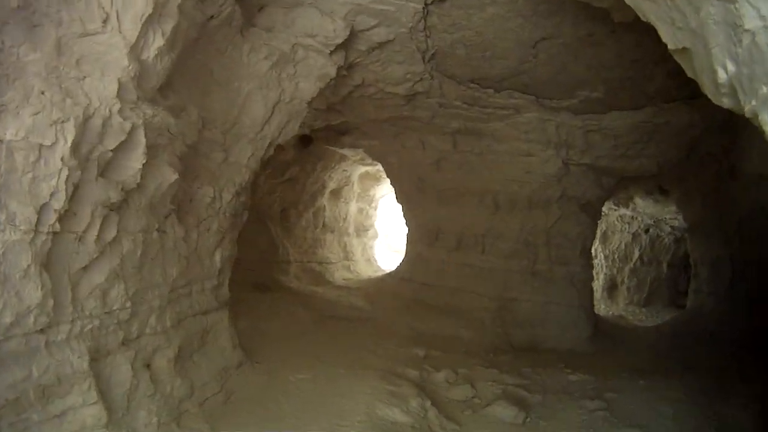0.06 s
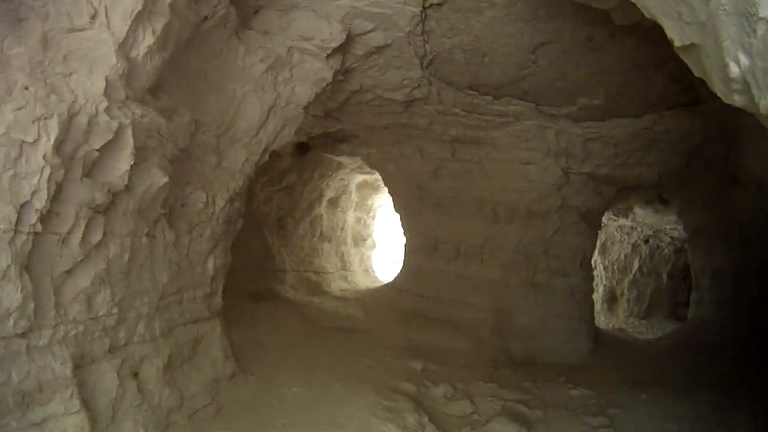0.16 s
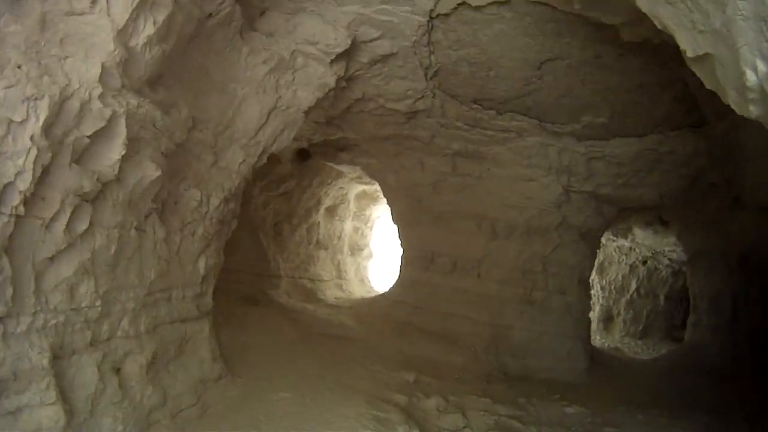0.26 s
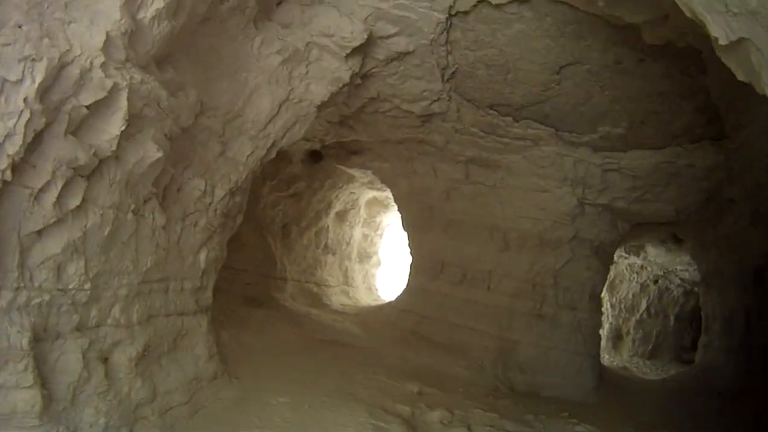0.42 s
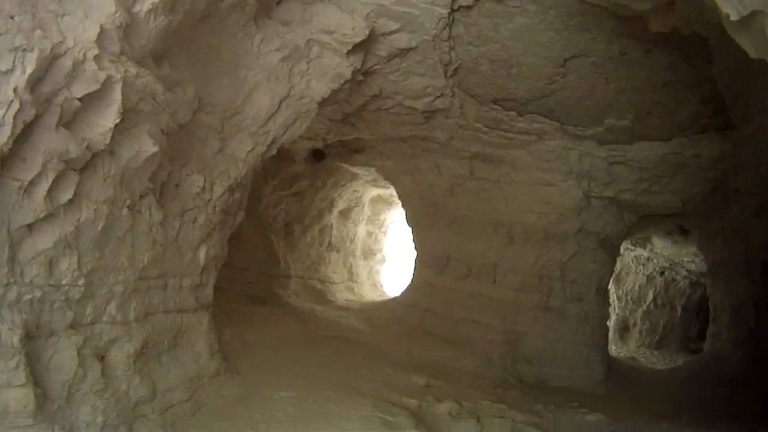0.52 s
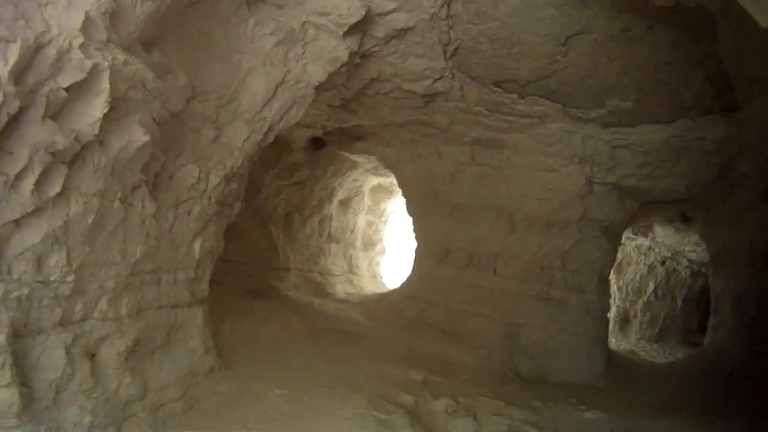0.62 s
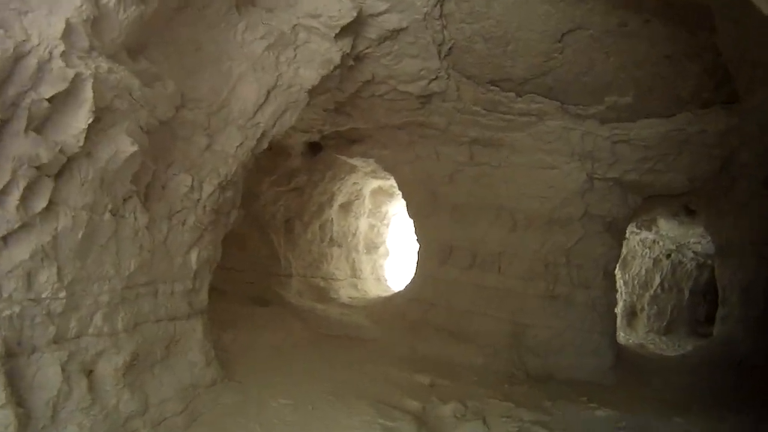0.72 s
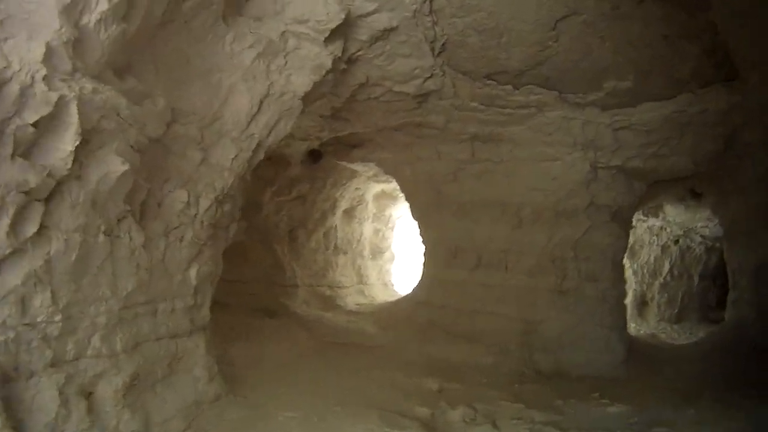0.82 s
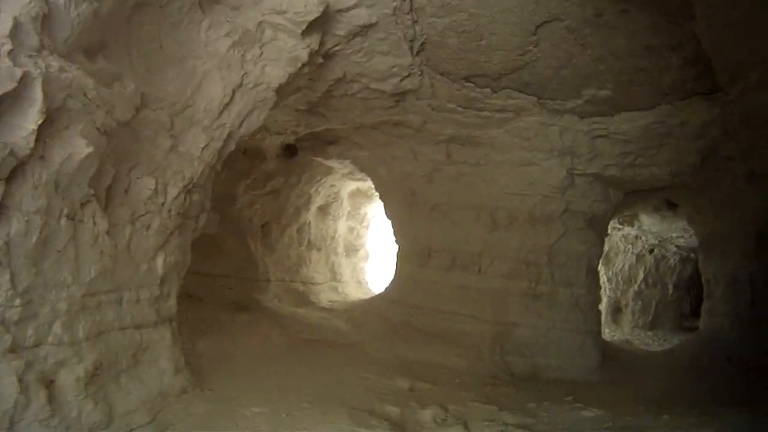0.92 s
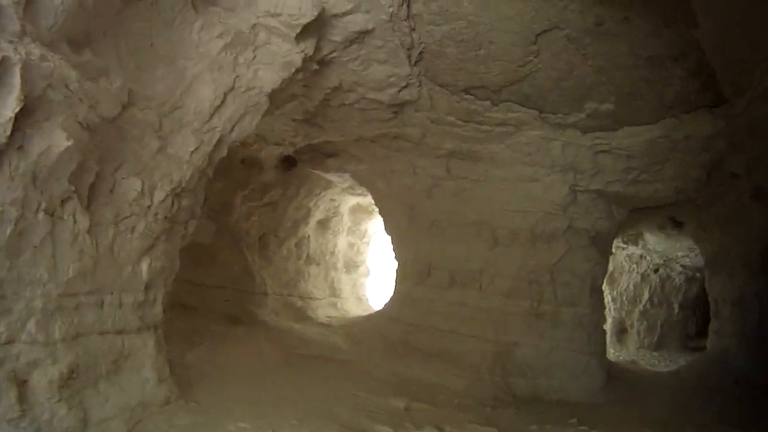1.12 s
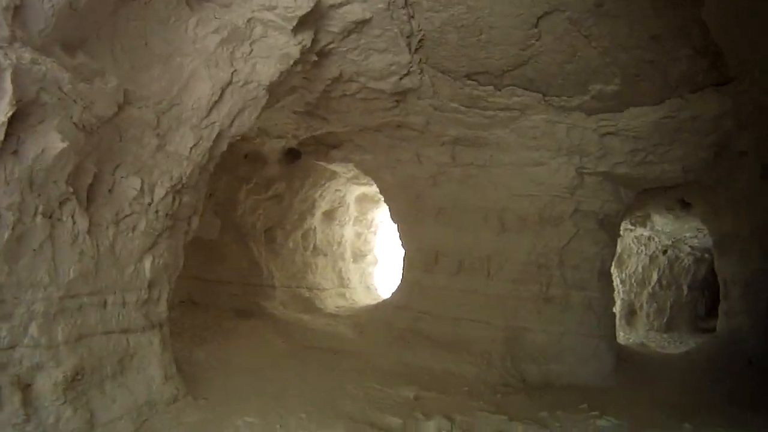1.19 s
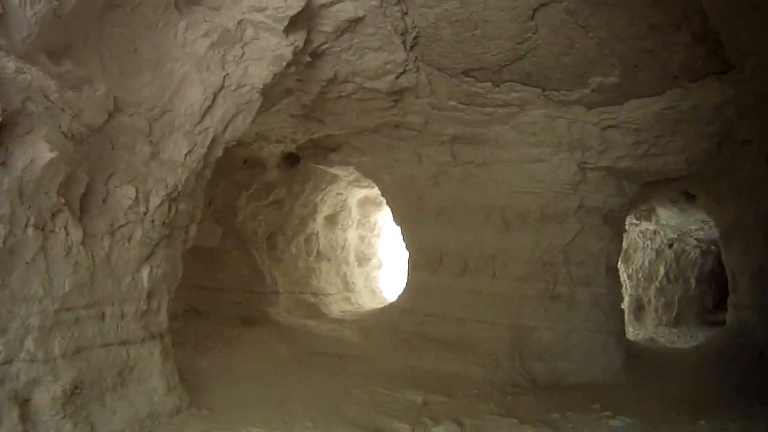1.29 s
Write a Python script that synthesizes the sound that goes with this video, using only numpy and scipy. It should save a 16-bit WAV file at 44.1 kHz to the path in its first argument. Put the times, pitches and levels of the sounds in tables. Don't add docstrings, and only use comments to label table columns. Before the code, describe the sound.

Someone walks over rubble in a rock passage; a sharp click comes first, then dense crunching, scuffing and squeaky chatter, thinning at the end, with handling rumble and a thin, grainy small-camera sound.

```python
import sys
import numpy as np
from scipy import signal
from scipy.fft import rfft, irfft
from scipy.io import wavfile
from scipy.ndimage import uniform_filter1d

SR = 44100
rng = np.random.default_rng(int(sys.argv[2]) if len(sys.argv) > 2 else 0)


def pcm_store(signal):
    levels = np.round(np.clip(np.atleast_2d(signal), -1, 1) * 32767)
    wavfile.write(sys.argv[1], SR, levels.astype(np.int16).T)


def amplitude_ratio(level_db):
    exponent = np.asarray(level_db, float) / 20
    return 10 ** exponent


N = 59535
TIME = np.arange(N) / SR
EDGE_HZ = 5500


def rms_one(x):
    return x / np.sqrt(np.mean(x ** 2) + 1e-20)


def evened(x, share, seconds):
    x = rms_one(x)
    power = uniform_filter1d(x ** 2, int(seconds * SR))
    return rms_one(x / (power + 0.00086) ** (share / 2))


def coloured(spectrum):
    hz, db = np.transpose(spectrum)
    f = np.arange(N // 2 + 1) * SR / N + 1e-3
    curve_db = np.interp(np.log(f), np.log(hz), db, left=-60, right=-80)
    return rms_one(irfft(rfft(rng.standard_normal(N)) * amplitude_ratio(curve_db), N))


def band(x, low_hz, high_hz, order=4):
    return signal.sosfilt(signal.butter(order, [low_hz, high_hz], "band", fs=SR, output="sos"), x)


def impulses(s, db):
    out = np.zeros(N)
    np.add.at(out, (np.array(s) * SR).astype(int), amplitude_ratio(db))
    return out


def strike(force, modes):
    rings = []
    for hz, db, t60 in modes:
        r = amplitude_ratio(-60 / (t60 * SR))
        w = 2 * np.pi * hz / SR
        ring = signal.lfilter([0, np.sin(w)], [1, -2 * r * np.cos(w), r * r], force + 1e-18)
        rings.append(amplitude_ratio(db) * ring)
    return np.array(rings)


# (frequency [Hz], density [dB per Hz])
AIR = [(88, -19), (150, -2.5), (396, -3), (591, -6.5), (711, -5.5), (1010, -8), (2260, -9), (4950, -17.5),
       (5950, -17.5), (7740, -60), (13100, -120)]


def air():
    return amplitude_ratio(-62.5) * coloured(AIR)


# (time [s], level [dB])
SHAKE = [(0.0, -51), (0.074, -59), (0.168, -45.5), (0.24, -55), (0.344, -50.5), (0.372, -56), (0.406, -48),
         (0.446, -51), (0.548, -56), (0.62, -51.5), (0.71, -55), (0.97, -52.5), (0.992, -59),
         (1.138, -49.5), (1.15, -57.5), (1.258, -52), (1.318, -63.5), (1.35, -48)]
# (frequency [Hz], density [dB per Hz])
RUMBLE = [(8.8, -17), (15, 0), (54, 1), (77, -3.5), (125, -14), (211, -21), (300, -29.5), (390, -54),
          (660, -120)]


def rumble():
    level_db = np.interp(TIME, *np.transpose(SHAKE)) - 1.5
    return amplitude_ratio(level_db) * evened(coloured(RUMBLE), 0.75, 0.047)


def scrapes(strokes, modes):
    grains_per_s, spread_db = 1000, 3
    favour_db_per_oct2, favour_floor_db = 128, 5.5
    shape = (len(modes), N)
    hits = rng.random(shape) < grains_per_s / SR
    signs = rng.choice([-1, 1], N)
    grit = hits * signs * amplitude_ratio(spread_db * np.minimum(rng.exponential(1, N), 5))
    power = np.zeros(shape)
    hz, mode_db, _ = np.transpose(modes)
    for s, length, db, favoured_hz in strokes:
        loss_db = np.minimum(favour_db_per_oct2 * np.log2(hz / favoured_hz) ** 2, favour_floor_db)
        share = amplitude_ratio(mode_db - loss_db)
        share = share / np.sqrt(np.sum(share ** 2))
        swell = np.cos(np.pi / 2 * np.clip((TIME - s) / (0.65 * length), -1, 1))
        power += (amplitude_ratio(db) * share[:, None] * swell) ** 2
    out = np.zeros(N)
    for p, grains, mode in zip(power, grit, modes):
        out += np.sqrt(p) * evened(strike(grains, [mode])[0], 0.64, 0.013)
    return out


# (middle time [s], length [s], level [dB], favoured pitch [Hz])
GRAZES = [(.015, 0.046, -60.5, 1900), (.03, 0.052, -62.5, 2700), (.165, 0.03, -64, 2180),
          (.34, 0.021, -58.5, 2380), (.425, 0.023, -55.5, 1810), (.535, 0.049, -59.5, 2500),
          (.585, 0.054, -66, 2430), (.612, 0.026, -53.5, 1460), (.647, 0.016, -60, 2430),
          (.652, 0.0083, -54, 1373), (.258, 0.066, -59.5, 2620), (.59, 0.017, -61, 2270),
          (.889, 0.0079, -61, 2100), (.70, 0.09, -62, 2250), (.752, 0.031, -50.5, 2260),
          (.785, 0.039, -51.5, 2350), (.81, 0.038, -56, 2400), (.838, 0.032, -52, 2320),
          (.858, 0.023, -63, 1900), (.895, 0.024, -60, 2080), (.925, 0.072, -54.5, 2240),
          (.956, 0.027, -58.5, 2190), (.995, 0.032, -58.5, 1970), (1.056, 0.0094, -62.5, 1960),
          (1.097, 0.023, -58, 2140), (1.13, 0.02, -64, 2600), (1.153, 0.01, -55, 2100),
          (1.174, 0.017, -52, 1690), (1.21, 0.043, -65, 2400), (1.245, 0.024, -56, 2280)]
# (frequency [Hz], level [dB], t60 [s])
RUB_BRIGHT = [(1373, -2, 0.042), (1655, -2, 0.095), (1900, -6, 0.035), (2038, -1.5, 0.024),
              (2273, 2, 0.026), (2570, -3.5, 0.016), (2840, -16, 0.031), (3275, -11.5, .03),
              (4430, -12.5, 0.0054)]


def grazes():
    return band(scrapes(GRAZES, RUB_BRIGHT), 960, EDGE_HZ, order=2)


# (middle time [s], length [s], level [dB], favoured pitch [Hz])
GRINDS = [(.012, 0.041, -61, 830), (.425, 0.046, -66.5, 875), (.607, 0.012, -54.5, 584),
          (.617, 0.011, -56.5, 830), (.669, 0.037, -62.5, 830), (.705, 0.072, -61.5, 620),
          (.75, 0.031, -62, 810), (.795, 0.032, -56, 800), (.812, 0.04, -57.5, 830),
          (.84, 0.072, -63.5, 795), (.903, 0.027, -55, 830), (.924, 0.028, -52.5, 830),
          (.934, 0.012, -47, 860), (.98, 0.078, -60, 646), (1.058, 0.016, -59, 750),
          (1.153, 0.014, -53, 830)]
# (frequency [Hz], level [dB], t60 [s])
RUB_DEEP = [(584, -3, 0.1), (635, -4.5, 0.11), (831, -4.5, 0.035), (887, -17, 0.058)]


def grinds():
    return band(scrapes(GRINDS, RUB_DEEP), 543, 1020, order=3)


# (time [s], level [dB], width [s])
PUSHES = [(0.161, -55, 0.0056), (0.176, -53, 0.0034), (0.331, -47, 0.0052), (.409, -37, 0.005),
          (0.588, -45, 0.0036), (0.624, -41.5, .007), (0.423, -52.5, 0.0043), (0.96, -51, 0.0063),
          (1.072, -53.5, .004), (1.116, -48, .005)]


def pushes():
    out = np.zeros(N)
    for s, db, width in PUSHES:
        u = (TIME - s) / width
        out += amplitude_ratio(db) * (u ** 2 - 1) * np.exp(-u ** 2 / 2)
    return out


# (time [s], bright-mode level [dB], deep-mode level [dB])
CLICK = [
    (.2070, -10.5, -10.5),
    (.2085, -19.5, -34),
    (0.2106, -19.5, -19.5),
    (.2185, -29.5, -53),
]
# (frequency [Hz], level [dB], t60 [s])
BRIGHT = [(1636, -26, 0.058), (2066, -8, 0.026), (2335, -8, 0.044), (2630, -17.5, 0.035),
          (3040, -24.5, 0.031), (3222, -12, 0.027), (3576, -38, 0.063), (4400, -26.5, 0.0083),
          (5080, -19.5, 0.014), (5335, -30.5, 0.026)]
# (frequency [Hz], level [dB], t60 [s])
DEEP = [(658.3, -6, 0.04), (648.5, -14.5, .105), (710, -36.5, 0.36), (817, -3, 0.02), (923, -11, 0.058)]
# (frequency [Hz], level [dB], t60 [s])
SIDE_MODES = [(351, -27, 0.2), (1147, -24.5, 0.135)]


def click():
    s, bright_db, deep_db = np.transpose(CLICK)
    blow = impulses(s, deep_db)
    bright = band(strike(impulses(s, bright_db), BRIGHT).sum(axis=0), 1730, EDGE_HZ, order=3)
    deep = band(strike(blow, DEEP).sum(axis=0), 562, 949)
    thin = np.zeros(N)
    for ring, (hz, _, _) in zip(strike(blow, SIDE_MODES), SIDE_MODES):
        thin += band(ring, hz * 0.27, hz * 2.2, order=2)
    return bright + deep + thin


# (time [s], peak level [dB])
TICKS = [(0.5866, -44.5), (0.6518, -44), (0.6836, -31), (0.6914, -36), (.6968, -41), (.6995, -44),
         (.703, -47), (0.7438, -41.5), (0.8214, -46), (.8555, -47), (.8672, -54), (1.244, -55)]
# (frequency [Hz], level [dB], t60 [s])
PEBBLE = [(3550, -4, 0.0098), (4520, -14.5, 0.011), (3240, -14, 0.0071), (5260, -26, 0.0036)]


def ticks():
    return band(strike(impulses(*np.transpose(TICKS)), PEBBLE).sum(axis=0), 2700, EDGE_HZ, order=2)


# (middle time [s], length [s], peak level [dB], pitch [Hz])
SLIPS = [(0.656, 0.024, -57, 2239), (0.6592, 0.008, -41, 2045), (0.661, 0.013, -48.5, 3251),
         (0.6696, 0.022, -48, 635), (0.7443, 0.008, -58, 3434), (0.7458, 0.0093, -38.5, 2185),
         (0.7468, 0.01, -46, 1754), (0.752, 0.008, -43, 2185), (0.7567, 0.013, -45, 1625),
         (0.76, 0.016, -48.3, 2271), (0.7772, 0.01, -47, 2142), (0.7842, 0.012, -49.5, 2583),
         (0.7897, 0.0069, -46, 2250), (0.796, 0.008, -45, 2164), (0.798, 0.009, -58, 3273),
         (0.8003, 0.028, -47.5, 635), (0.8072, 0.006, -48.5, 3240), (0.8136, 0.009, -44.5, 2034),
         (0.816, 0.014, -57, 3219), (0.8185, 0.02, -42.5, 635), (0.823, 0.034, -54.5, 796),
         (0.8296, 0.013, -52.2, 2045), (0.8368, 0.011, -42.5, 2282), (0.841, 0.0056, -43, 1991),
         (0.8466, 0.026, -49.1, 1679), (0.8576, 0.011, -52.1, 2024), (0.9, 0.014, -44, 2013),
         (0.9076, 0.046, -44.5, 656), (0.9134, 0.015, -61, 3240), (0.9152, 0.0087, -39.5, 2034),
         (0.9224, 0.024, -49.5, 1948), (0.9239, 0.029, -32, 635), (0.9276, 0.01, -45, 2250),
         (0.935, 0.016, -47.9, 2121), (0.9578, 0.022, -54.5, 1593), (0.9583, 0.0086, -48, 1959),
         (1.1539, 0.013, -49, 635), (1.1606, 0.02, -45.5, 2024), (1.1673, 0.02, -40.1, 624),
         (1.1678, 0.013, -58, 3305), (1.1683, 0.018, -47.7, 850), (1.176, 0.018, -54, 2174),
         (1.1781, 0.028, -50, 613), (1.1788, 0.028, -56, 839), (1.245, 0.0079, -46.5, 2013),
         (1.3474, 0.013, -47.5, 2077)]


def slips():
    wobble_rad, wobble_s = 0.22, 0.006
    smooth = np.hanning(int(wobble_s * SR))
    out = np.zeros(N)
    for s, length, db, hz in SLIPS:
        start = rng.uniform(0, 2 * np.pi)
        tremble = signal.fftconvolve(rng.standard_normal(2048), smooth, "same")
        at = np.arange(int((s - length / 2) * SR), min(int((s + length / 2) * SR), N))
        wobble = wobble_rad * rms_one(tremble)[:len(at)]
        swell = np.cos(np.pi * (TIME[at] - s) / length) ** 2
        out[at] += amplitude_ratio(db) * swell * np.sin(2 * np.pi * hz * TIME[at] + start + wobble)
    return band(out, 500, EDGE_HZ)


# (middle time [s], length [s], level [dB], favoured pitch [Hz])
RASPS = [(1.3, 0.027, -70, 4100), (0.92, 0.022, -57, 6700), (.815, 0.038, -61, 3400),
         (.845, 0.019, -67, 2500), (.915, 0.04, -58, 2500), (.905, .03, -62.5, 5200),
         (0.76, 0.013, -66, 3300), (1.162, 0.018, -58.5, 3700), (0.73, 0.013, -58, 3500),
         (.785, 0.028, -59, 3600), (0.79, .01, -62, 3700)]
# (frequency [Hz], level [dB], t60 [s])
RUB_HIGH = [(3290, -3.5, 0.035), (3510, -8, .02), (4100, -19, 0.0092), (5230, -7.5, 0.028)]


def rasps():
    return band(scrapes(RASPS, RUB_HIGH), 2430, EDGE_HZ, order=2)


def tunnel(x):
    level_db, t60_s, wall_cut_hz = -26, 0.15, 3000
    t = np.arange(SR // 2) / SR
    tail = rng.standard_normal(len(t)) * amplitude_ratio(-60 * t / t60_s) * (t > 0.006)
    tail = signal.sosfilt(signal.butter(1, wall_cut_hz, fs=SR, output="sos"), tail)
    return amplitude_ratio(level_db) * signal.fftconvolve(x, tail / np.sqrt(np.sum(tail ** 2)))[:N]


def scene():
    near = grazes() + grinds() + rasps() + ticks()
    knock = click()
    to_walls = near + amplitude_ratio(-11) * band(knock, 1300, EDGE_HZ, order=2)
    carried = rumble() + pushes()
    return (air() + carried + near + knock + slips() + tunnel(to_walls))[None]


def band_limit(x):
    return signal.sosfilt(signal.butter(12, 16660, fs=SR, output="sos"), x)


def record(dry):
    soft = signal.sosfilt(signal.butter(6, EDGE_HZ, fs=SR, output="sos"), dry)
    slow = signal.resample_poly(soft, 40, 147, axis=1)
    held = signal.resample_poly(np.repeat(slow, 4, axis=1), 147, 160, axis=1)[:, :N]
    return band_limit(held)


dry = scene()
out = record(dry)
pcm_store(out)
```